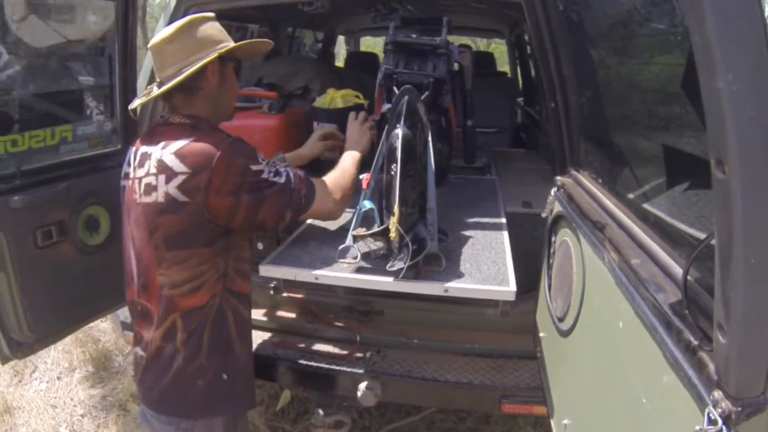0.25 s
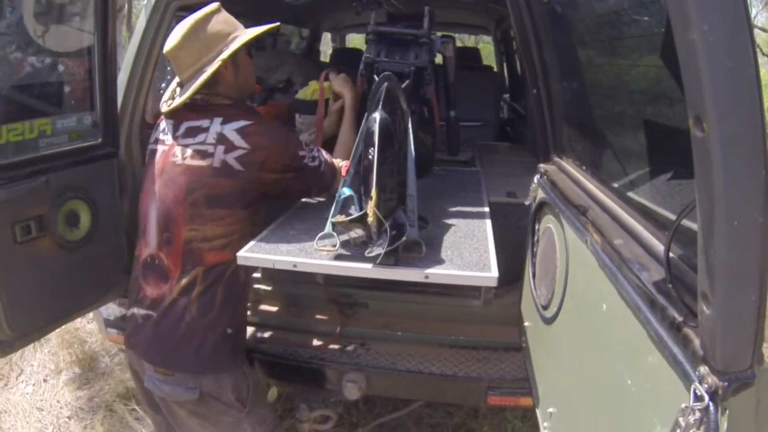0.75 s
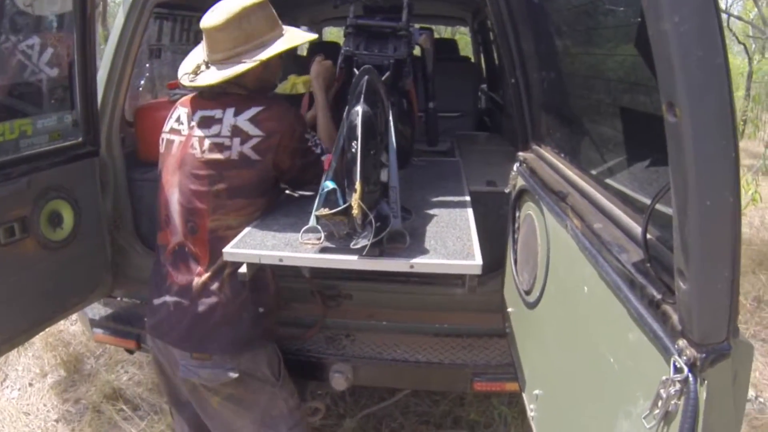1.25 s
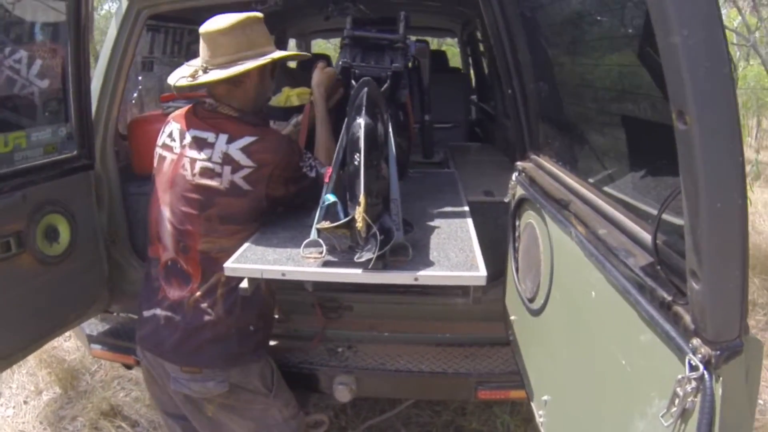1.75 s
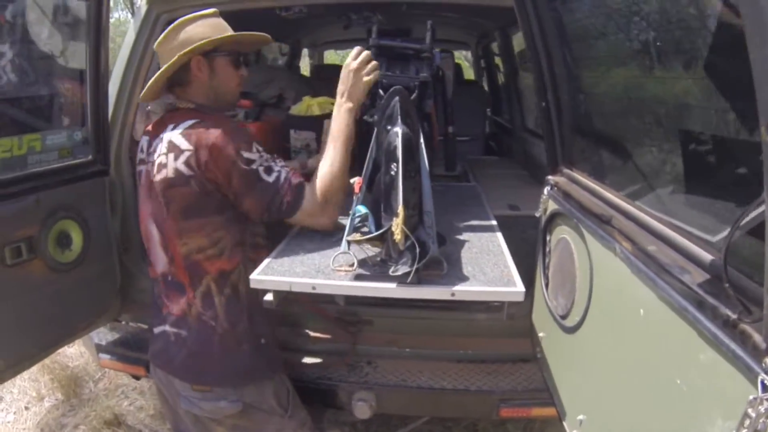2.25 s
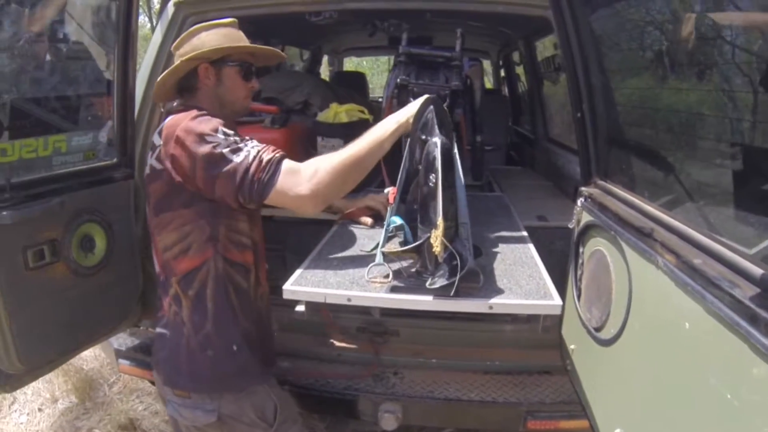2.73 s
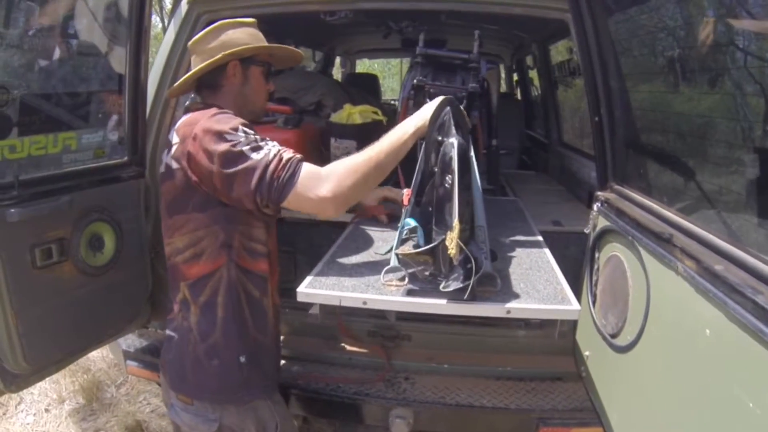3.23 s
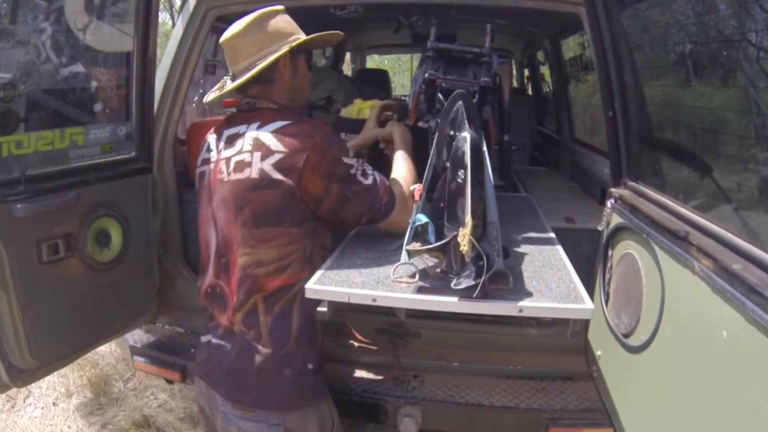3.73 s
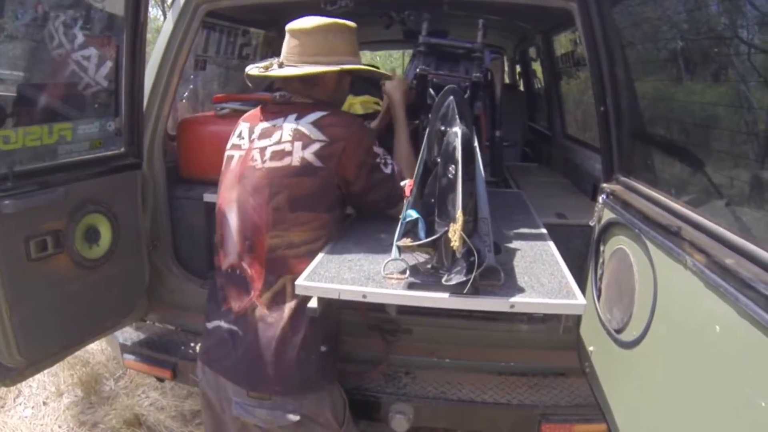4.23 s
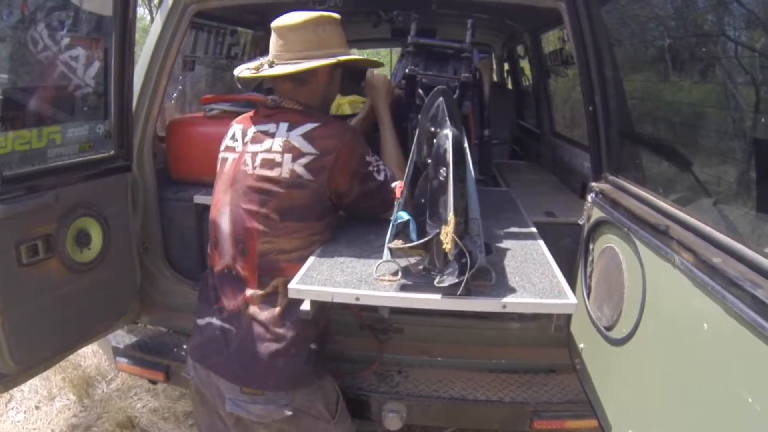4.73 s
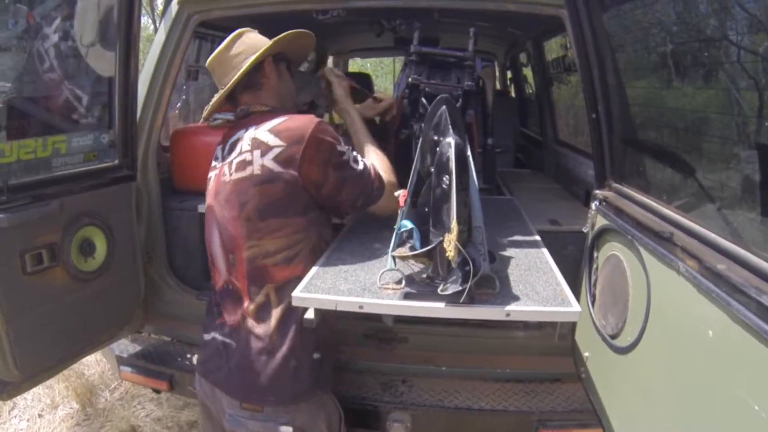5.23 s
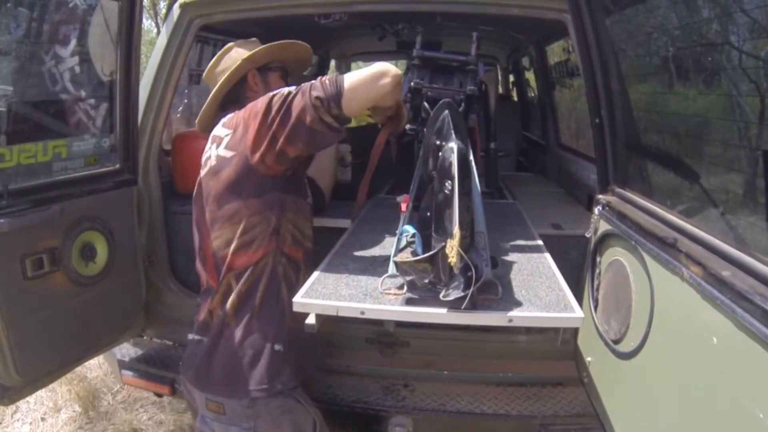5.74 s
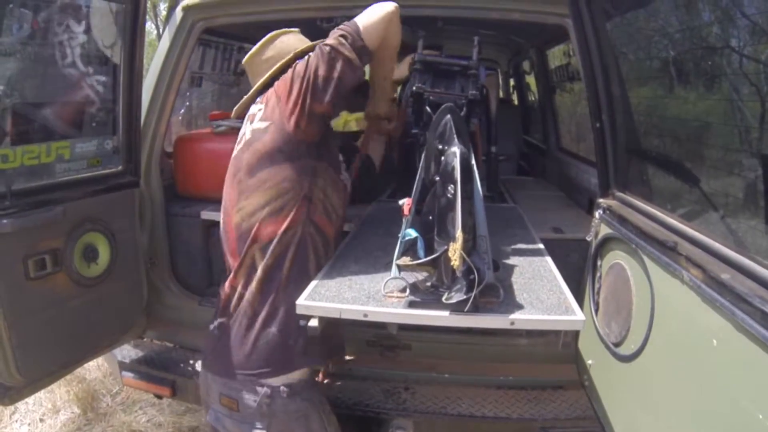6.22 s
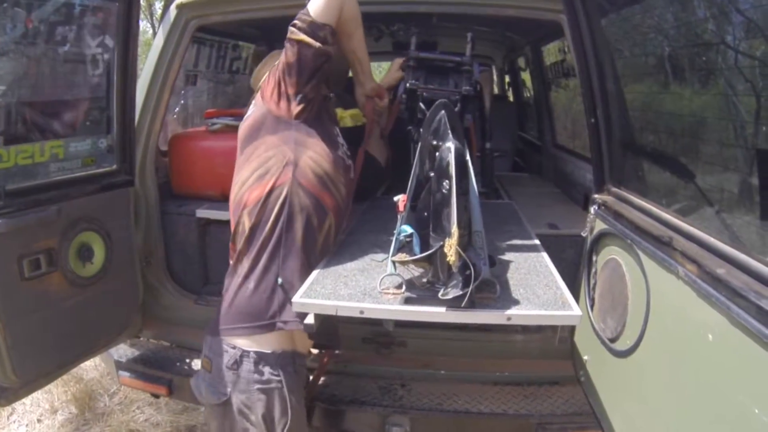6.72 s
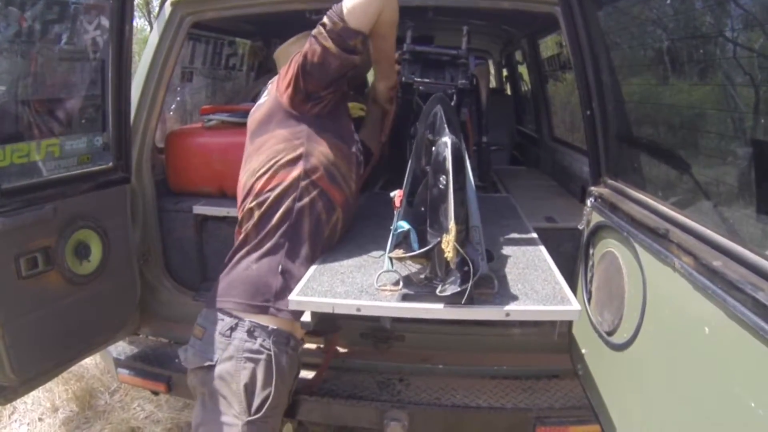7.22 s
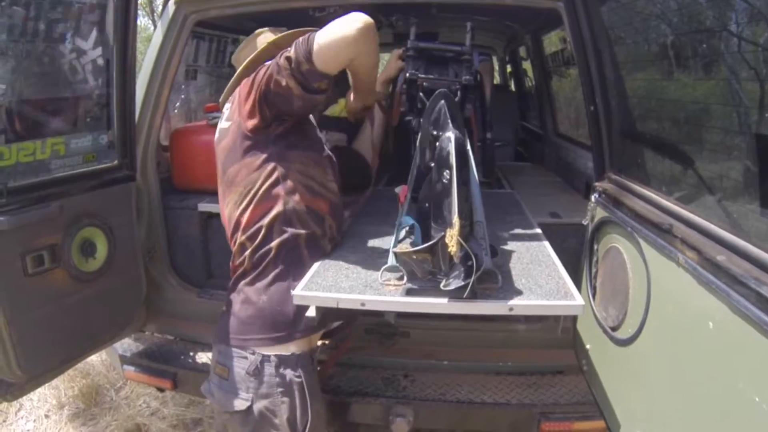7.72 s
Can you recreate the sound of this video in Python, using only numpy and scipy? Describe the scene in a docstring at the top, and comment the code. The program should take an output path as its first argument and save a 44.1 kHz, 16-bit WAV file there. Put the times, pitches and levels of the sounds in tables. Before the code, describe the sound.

A ratchet tie-down strap is worked in the open back of a vehicle in dry bush. Small ticks, then a quick run of sharp steel clicks near one second, a bang on the deck, more clicks at two seconds, hollow knocks and soft bumps. The loudest rattling bang comes just before five seconds, another after seven. Leaves and cloth rustle, insects drone faintly, far birds chirp. Close microphone, short cabin tail.

```python
"""A ratchet strap is worked in the open back of a parked truck in the bush; every blow rings on in the cabin.
Throughout, filtered noise makes rustling leaves and cloth, an insect drone and a buzzing singer.
Struck resonances give first ticks and handle knocks, soft bumps from 0.8 s, pawl clicks from 1 s and scuffs
from 1.7 s. The load bangs on the drawer deck at 1.4 s, hardest at 4.7 s, and again at 7.1 s.
A few far birds, gliding sine tones, chirp at 0.1 s and between 4.3 and 5.9 s."""
import sys
import numpy as np
from scipy import signal
from scipy.io import wavfile
from scipy.ndimage import uniform_filter1d

SR = 44100
rng = np.random.default_rng(int(sys.argv[2]) if len(sys.argv) > 2 else 0)


def dump_mix(stems):
    """Bounce the given channels to the path in sys.argv[1] as a 16-bit WAV at rate SR."""
    frames = np.atleast_2d(stems).T  # one column per channel
    limited = np.clip(frames, -1, 1)  # hard clip at full scale
    pcm = np.round(limited * 32767).astype(np.int16)
    wavfile.write(sys.argv[1], SR, pcm)


N = 351471


def from_db(db):
    """Gain of a level in dB."""
    return 10 ** (np.asarray(db) / 20)


def rms_one(x):
    """Scales a signal to rms 1."""
    return x / np.sqrt(np.mean(x ** 2) + 1e-20)


def resonate(x, hz, width_hz):
    """Two-pole resonance with a gain of about 1 at its peak."""
    radius = np.exp(-np.pi * width_hz / SR)
    feedforward = (1 - radius ** 2) / 2 * np.array([1, 0, -1])
    feedback = [1, -2 * radius * np.cos(2 * np.pi * hz / SR), radius ** 2]
    return signal.lfilter(feedforward, feedback, x)


def highpass(x, order, hz):
    """Takes out the bass below an edge."""
    return signal.sosfilt(signal.butter(order, hz, "high", fs=SR, output="sos"), x)


def softened(x, hz):
    """A softer contact carries no treble: a steep low-pass."""
    return signal.sosfilt(signal.butter(6, min(hz, .45 * SR), fs=SR, output="sos"), x)


def drift(rate_hz):
    """Random wander of rms 1: noise smoothed by two equal poles at the given rate."""
    step = 40  # samples between computed points
    r = np.exp(-2 * np.pi * step * rate_hz / SR)
    noise = rng.standard_normal(N // step + 2002)
    wander = signal.lfilter([1], [1, -2 * r, r * r], noise)[2000:]  # skip the filter's start
    return np.interp(np.arange(N) / step, np.arange(len(wander)), rms_one(wander))


def burst(rise_s, t60, tail_db, tail_t60, strike_db, rebounds=(), grain_share=1):
    """A clean strike and its rebounds, a crowd of close echoes and rattles, then a weaker, duller cabin tail."""
    t = np.arange(SR // 2) / SR
    rise = (1 - np.exp(-t / max(rise_s, 1e-5))) ** 2
    rattle, tail = rng.standard_normal((2, len(t)))
    # a small grain share leaves sparse, stronger grains
    share = np.clip(grain_share, .002, 1)
    rattle = rattle * (rng.random(len(t)) < share) / np.sqrt(share)
    dull = np.exp(-2 * np.pi * 5000 / SR)  # one pole at 5 kHz
    tail = signal.lfilter([1 - dull], [1, -dull], tail)
    rattle_gain = from_db(-60 * t / t60)
    tail_gain = from_db(tail_db - 60 * t / tail_t60)
    out = rise * (rattle_gain * rattle + tail_gain * tail)
    for later_s, db in [(0, 0), *rebounds]:
        out[round((2 * rise_s + later_s) * SR)] += from_db(strike_db + db)
    return out


def ring(x, modes):
    """Parallel resonances (pitch [Hz], width [Hz], level [dB]) with alternating signs."""
    out = 0
    for k, (hz, width, db) in enumerate(modes):
        out = out + (-1) ** k * from_db(db) * resonate(x, hz, width)
    return out


def tilted(modes, low_hz, low_db, high_hz, high_db):
    """The modes, with those under and over two edges struck harder or softer."""
    return [(hz, width, db + low_db * (hz < low_hz) + high_db * (hz > high_hz)) for hz, width, db in modes]


def add(out, s, peak_db, sound):
    """Places a sound, levelled by the loudest 3 ms within its first 20 ms."""
    at = round(s * SR)
    head_rms = np.sqrt(uniform_filter1d(sound[:SR // 50] ** 2, size=130).max())
    levelled = from_db(peak_db - 4.5) / head_rms * sound  # rms 4.5 dB under the nominal peak
    out[at:at + len(sound)] += levelled[:N - at]


def single_notes(rows, sharpness, rise_s, skirt, reach, strike_db):
    """Blows through one broad mode each, two resonances deep, cut steeply above reach times the pitch."""
    out = np.zeros(N)
    for s, peak_db, hz, t60 in rows:
        blow = burst(rise_s, t60, -21, 0.13, strike_db)
        width = hz / sharpness
        note = resonate(resonate(blow, hz, width), hz, skirt * width)
        add(out, max(s - rise_s, 0), peak_db, softened(note, reach * hz))
    return out


# swells of leaves, cloth and strap: (time [s], level [dB]); only the height above the lowest row counts
RUSTLE_SWELLS = [(0.0, -73), (0.95, -72.5), (1.28, -65.5), (1.8, -69.5), (2.201, -66.5), (2.68, -70.5),
                 (3.0, -63.5), (3.31, -72.5), (3.79, -73), (4.68, -77.5), (4.82, -55), (4.9, -62.5),
                 (5.06, -64.5), (5.44, -68.5), (5.88, -72), (6.88, -70.5), (7.19, -62.5), (7.57, -72.5)]
# tone colour of the bed: (frequency [Hz], relative level [dB])
AIR_COLOUR = [(30, -32), (150, -6), (240, -5.5), (900, -1.5), (1430, -12), (1930, -5.5), (2490, -18),
              (3440, -15.5), (4640, -27), (6500, -31.5), (9000, -36), (11800, -42.5), (13600, -35),
              (15300, -47.5)]
RUSTLE_TREBLE_SHARE = 0.41  # share of the swing that reaches the treble


def air():
    """Leaves, cloth and strap: third-octave noise bands, each wavering; the rustle lifts the bass most."""
    s, level_db = np.transpose(RUSTLE_SWELLS)
    swing_db = np.interp(np.arange(N) / SR, s, level_db - level_db.min())
    colour_hz, colour_levels_db = np.array(AIR_COLOUR).T
    edges = 30 * 2 ** (np.arange(28) / 3)
    white = rng.standard_normal((2, N))
    out = 0
    for k, (low, high) in enumerate(zip(edges, edges[1:])):
        hz = np.sqrt(low * high)
        band_filter = signal.butter(2, [low, high], "band", fs=SR, output="sos")
        band = signal.sosfilt(band_filter, white[k % 2])  # neighbours use different noise
        treble = np.clip(np.log2(hz / 900), 0, 1)
        reach = np.clip(np.log2(9000 / hz), 0, 1)  # the rustle does not reach the far treble
        rustle_db = reach * (1 - treble + treble * RUSTLE_TREBLE_SHARE) * swing_db
        colour_db = np.interp(np.log(hz), np.log(colour_hz), colour_levels_db)
        waver_db = 1.3 * drift(9)
        out = out + band * from_db(colour_db - 55.0 + rustle_db + waver_db)
    return out


# drone and its octave: (pitch [Hz], width [Hz], rms level before waver [dB], waver rate [Hz], waver [dB])
DRONE = [(5113, 150, -92.5, 20, -0.5), (10250, 350, -103, 25, 1.2)]
# buzzing singer: (pitch [Hz], width [Hz], rms level [dB])
BUZZ_BANDS = [(7850, 400, -105), (15000, 500, -107)]
PHRASES_PER_S, PHRASE_AT_S, PHRASE_DB = 4.65, 3.38, 7  # one phrase peaks at PHRASE_AT_S
BUZZ_PER_S, BUZZ_DB = 60, 6


def insects():
    """Narrow noise bands: a thin steady drone with its octave, and a singer buzzing in short even phrases."""
    t = np.arange(N) / SR
    phrases_db = PHRASE_DB * np.cos(2 * np.pi * PHRASES_PER_S * (t - PHRASE_AT_S))
    buzz_db = BUZZ_DB * np.cos(2 * np.pi * BUZZ_PER_S * t)
    singer_db = phrases_db + buzz_db + 2.5 * drift(1.1)
    out = 0
    for hz, width, db, rate_hz, waver_db in DRONE:
        song = resonate(resonate(rng.standard_normal(N), hz, width), hz, width)
        out = out + from_db(db + waver_db * drift(rate_hz)) * rms_one(song)
    for hz, width, db in BUZZ_BANDS:
        song = resonate(resonate(rng.standard_normal(N), hz, width), hz, width)
        out = out + from_db(db) * rms_one(from_db(singer_db) * song)
    return out


# small ticks of buckle and hooks; the 1.566 s row is the treble scrape of the load bang at 1.564 s, the 2.9645
# s row # the upper ring of the knock at 2.965 s: (time [s], nominal peak [dB], pitch [Hz], rattle t60 [s])
BUCKLE_TICKS = [(0.0044, -43, 1806, 0.013), (0.639, -51, 2640, 0.073), (1.309, -53, 1920, 0.029),
                (1.4137, -49, 1885, 0.017), (1.4154, -59, 3600, 0.025), (1.566, -64, 8650, 0.1),
                (1.6, -61.5, 5960, 0.086), (1.6035, -42, 2850, 0.01), (1.614, -43.5, 2630, 0.016),
                (2.456, -60.5, 3100, 0.022), (2.4578, -51.5, 1730, 0.041), (2.7467, -50.5, 4350, 0.027),
                (2.7477, -35.5, 1920, 0.013), (2.7781, -64, 4350, 0.077), (2.7826, -48.5, 1960, 0.19),
                (2.852, -42.5, 3280, 0.078), (2.9645, -44, 2380, 0.034), (3.103, -50.5, 2050, .02),
                (3.2216, -53, 2190, 0.024), (4.0347, -54, 3750, 0.012), (4.0472, -61.5, 6300, 0.022),
                (4.9057, -59, 4600, 0.11), (5.7024, -56.5, 4400, 0.041), (5.7034, -57, 3400, 0.033),
                (6.315, -66, 5900, 0.033), (6.3185, -42, 1920, 0.03), (7.2494, -65, 6130, .1),
                (7.6106, -51, 4500, 0.073), (7.6116, -42.5, 3470, 0.03), (7.6555, -67.5, 5200, .03)]


def ticks():
    """Buckle and hooks, the treble scrape of one bang and the upper ring of one knock: small light blows, each
    ringing one fairly narrow mode."""
    return single_notes(BUCKLE_TICKS, sharpness=8.9, rise_s=0.0018, skirt=1.46, reach=1.38, strike_db=10.5)


# handle and hook knocks: (time [s], nominal peak [dB], main pitch [Hz], upper mode [dB re main])
HANDLE_KNOCKS = [(0.054, -49, 910, -40), (1.243, -47.5, 730, -17), (2.547, -50.5, 664, -27),
                 (2.59, -38.5, 938, -44), (2.661, -70, 767, -25), (2.965, -35, 1022, -5),
                 (3.078, -52, 920, -16), (3.22, -45.5, 870, -17), (3.296, -56.5, 633, -19),
                 (3.478, -57.5, 980, -25), (4.055, -35.5, 1020, -32), (4.52, -46, 984, 7),
                 (4.604, -31, 1046, -11), (5.043, -21, 890, -50), (5.27, -45.5, 860, -3),
                 (5.417, -37, 904, -39), (5.571, -42, 876, -40), (5.667, -55, 840, -35),
                 (5.703, -48.5, 960, -18), (6.15, -33, 830, -52), (6.318, -51, 660, 3.5),
                 (6.574, -28.5, 916, -2.5), (7.03, -34, 842, -39)]
KNOCK_T60_S, KNOCK_WIDTH_HZ = 0.051, 206
KNOCK_UPPER_HZ, KNOCK_LOW_HZ = (1970, 400), (227, 230)  # (pitch [Hz], width [Hz])


def knocks():
    """Short hollow blows: a main mode, one at 1970 Hz and one at 227 Hz, each three resonances in series."""
    out = np.zeros(N)
    for s, peak_db, main_hz, upper_db in HANDLE_KNOCKS:
        blow = burst(0.00054, KNOCK_T60_S, -20.5, 0.14, strike_db=22.0)
        low_db = -24 + 0.07 * peak_db  # a harder knock has slightly more of the low mode
        modes = [(main_hz, KNOCK_WIDTH_HZ, 0), (*KNOCK_UPPER_HZ, upper_db), (*KNOCK_LOW_HZ, low_db)]
        sound = 0
        for hz, width, db in modes:
            swelling = resonate(resonate(blow, hz, width), hz, width)
            sound = sound + from_db(db) * resonate(swelling, hz, 1.6 * width)
        add(out, s - .003, peak_db, softened(sound, 1600))
    return out


# bird chirps: (time [s], length [s], first pitch [Hz], last pitch [Hz], level before fades and trees [dB rms])
CHIRPS = [(0.115, 0.016, 4200, 4730, -75), (4.271, 0.034, 4300, 4930, -63), (4.415, 0.025, 6400, 6130, -88),
          (5.431, 0.11, 6520, 3330, -73.5), (5.889, 0.024, 4010, 3900, -74.5)]
GLIDE_CURVE = 3.0  # above 1 the glide slows down towards its end


def birds():
    """Far whistles: gliding sines, faded in and out, roughened and smeared by the trees."""
    out = np.zeros(N)
    for s, length_s, first_hz, last_hz, level_db in CHIRPS:
        t = np.linspace(0, 1, round(length_s * SR))
        hz = last_hz + (first_hz - last_hz) * (1 - t) ** GLIDE_CURVE
        tone = np.sqrt(2) * np.sin(2 * np.pi * np.cumsum(hz) / SR) * from_db(level_db)
        at = round(s * SR)
        out[at:at + len(t)] += tone * signal.windows.tukey(len(t), .4)
    rough = out * from_db(4.0 * drift(72))
    echoes = rms_one(burst(0.00078, 0.075, -54, 0.17, strike_db=-27.0)) / np.sqrt(SR / 2)  # unit energy
    return signal.fftconvolve(rough, echoes)[:N]


# soft bumps of body and load: (time [s], nominal peak [dB], pitch [Hz])
BODY_THUMPS = [(0.816, -51.5, 215), (0.828, -54.5, 106), (1.276, -44, 260), (1.345, -41.5, 374),
               (1.369, -42.5, 297), (1.599, -55, 256), (1.625, -47.5, 273), (1.667, -45, 243),
               (2.784, -43, 344), (2.807, -47.5, 205), (2.881, -50, 269), (3.012, -59, 308),
               (3.105, -49, 426), (3.258, -55, 272), (3.359, -52, 278), (4.047, -44.5, 238),
               (4.275, -54.5, 505), (4.711, -29, 330), (4.728, -28.5, 231), (4.76, -38, 264),
               (6.317, -51, 296), (7.125, -25.5, 236), (7.228, -23.5, 223), (7.246, -30.5, 260)]
THUMP_T60_S = 0.12


def thumps():
    """Body and load: soft low bumps, each a slow-rising blow through one broad mode."""
    rows = [(*row, THUMP_T60_S) for row in BODY_THUMPS]
    return single_notes(rows, sharpness=3.45, rise_s=0.00403, skirt=19.0, reach=6.1, strike_db=15)


# pawl over a tooth: (time [s], nominal peak [dB], modes over 5 kHz [dB shift], rise [s])
PAWL_CLICKS = [(0.9893, -32, -9, .0009), (1.0255, -33, -9, 0.00068), (1.0532, -31.5, -12.5, 0.00056),
               (1.074, -32.5, -9, 0.0013), (1.109, -33, -6, 0.0013), (1.1916, -30, -3, .0013),
               (1.949, -31.5, -2.5, 0.0011), (1.9602, -33.5, -6, 0.00079), (2.0125, -28.5, -1.2, 0.0015),
               (2.0774, -29.5, -2.5, 0.00098), (2.851, -37.5, 1, 0.006), (4.6008, -30, -7, 0.0043),
               (4.9748, -29, -1.7, 0.0009), (5.077, -31, -1.5, 0.001), (7.231, -24, -7, 0.0012),
               (7.842, -34.5, -5.5, 0.0035)]
# modes of the ratchet and frame: (pitch [Hz], width [Hz], level [dB])
RATCHET_MODES = [(526, 90, -10.5), (1063, 260, -9.5), (1582, 203, -3), (1895, 123, 1.96), (2058, 140, -4.5),
                 (2250, 130, -4.5), (2720, 120, -8.5), (3007, 130, -13), (3420, 120, -9.5), (3695, 170, -9),
                 (4264, 150, -10.5), (4853, 130, -19), (5280, 300, -20), (6360, 470, -24),
                 (7340, 220, -25.5), (7900, 200, -27.5), (8450, 220, -24), (10450, 720, -31.5),
                 (11700, 440, -37), (13200, 700, -50.5)]
# the pawl bounces: (delay [s], level [dB re first strike])
PAWL_BOUNCES = [(.0034, 2.5), (.0068, -9.5)]
PAWL_T60_S, PAWL_T60_PER_RISE = 0.054, 9  # a slower snap also rings longer
PAWL_STRIKE_DB, FRAME_LAG_S = 21, .004


def pawl():
    """A sprung steel pawl snaps home and bounces; the frame's two lowest modes answer a moment later."""
    out = np.zeros(N)
    for s, peak_db, treble_db, rise_s in PAWL_CLICKS:
        modes = tilted(RATCHET_MODES, 0, 0, 5000, treble_db)
        t60 = PAWL_T60_S + PAWL_T60_PER_RISE * rise_s
        snap = burst(rise_s / 2, t60, -15, 0.24, PAWL_STRIKE_DB, PAWL_BOUNCES, grain_share=.25)
        late = np.pad(snap, (round(FRAME_LAG_S * SR), 0))[:len(snap)]
        click = ring(late, modes[:2]) + ring(snap, modes[2:])
        add(out, s - rise_s, peak_db, softened(click, 14500))
    return out


# load against the deck: (time [s], nominal peak before the bass cuts [dB], modes over 1300 Hz [dB shift],
# modes under 700 Hz [dB shift], rattle t60 [s], contact time [ms], damping [x mode width])
LOAD_BANGS = [(1.415, -38.5, -13, 1.5, 0.08, 0.19, 2.6), (1.562, -33, 0, -10, 0.041, 0.19, 1.7),
              (1.564, -22.5, 10, -8.5, 0.056, 0.35, 16.3), (4.698, -13.5, 11.5, 8, 0.15, 0.22, 1.64),
              (4.7055, -9.5, -2.5, 4.5, 0.068, 0.34, 0.99), (4.712, -13, 4, -6, 0.073, 0.18, 1.7),
              (4.724, -16, 2.5, -2.5, 0.091, 0.24, 1), (4.731, -19, -4.5, -11, 0.065, 0.52, 1.3),
              (4.744, -20, -16, 7, 0.046, 0.73, 1.6), (4.759, -23.5, 3.5, 6.5, .22, 0.47, 1.6),
              (4.897, -25, 0, -16, 0.13, 0.39, 1.5), (4.907, -19, -7, -11, 0.09, 0.59, 5.5),
              (4.92, -31.5, -12, -3, 0.042, 0.35, 7), (4.9292, -31.5, -16, -7, 0.13, 0.37, 5.3),
              (4.944, -29, -7.5, -12, 0.065, 0.55, 7.5), (7.1185, -25, -2.5, -5.5, 0.032, 0.35, 2.6),
              (7.1215, -17, 4, -12, 0.038, 0.43, 2.2), (7.126, -15.5, -5, 7.5, 0.042, 0.47, 3.6),
              (7.135, -27, -24, -15, .08, 0.4, 0.34), (7.187, -23, -13, -1.5, 0.038, 0.45, 1.6),
              (7.194, -24, -15, -8, 0.065, 0.73, 0.8), (7.223, -20.5, -9, -8, 0.084, 0.34, 1.2),
              (7.229, -18, 3, -3, 0.056, 0.2, 0.94), (7.238, -21, -10, -2.5, 0.029, 0.34, 2.3)]
# modes of the drawer deck: (pitch [Hz], width before damping [Hz], level before shifts [dB])
DECK_MODES = [(514, 58, 3), (628, 70, 6.5), (767.5, 49, 3), (909, 18, 7), (1101, 67, -0.5),
              (1220, 120, -11.5), (1300, 78, -7), (1510, 230, -16.5), (1707, 98, -10.5), (1943, 82, -5.5),
              (2254, 120, -11), (2967, 160, -19), (3682, 80, -17), (4070, 410, -25), (5260, 3900, -29.5)]
DECK_EDGE_HZ = 406  # the deck radiates little below this


def bangs():
    """Heavy blows keep rattling the deck's modes; a longer contact is duller, a held load rings less."""
    out = np.zeros(N)
    for s, peak_db, upper_db, low_db, t60, contact_ms, damping in LOAD_BANGS:
        struck = tilted(DECK_MODES, 700, low_db, 1300, upper_db)
        modes = [(hz, damping * width, db) for hz, width, db in struck]
        blow = burst(0.001433, t60, -20.0, 0.23, strike_db=20, grain_share=.12)
        add(out, s - .003, peak_db, softened(ring(blow, modes), 1e3 / contact_ms))
    return highpass(out, 3, DECK_EDGE_HZ)


# scuffs of strap and hand: (time [s], nominal peak [dB], centre [Hz], rattle t60 [s])
STRAP_SCUFFS = [(1.669, -48, 700, 0.08), (2.287, -49, 940, 0.071), (3.144, -47, 680, 0.043),
                (3.541, -54.5, 1350, 0.074)]


def scuffs():
    """Strap and hand: broad noisy strokes, each through one very wide resonance."""
    return single_notes(STRAP_SCUFFS, sharpness=1.9, rise_s=0.002, skirt=1.95, reach=4, strike_db=8)


def scene():
    """All sources on one channel; small bodies radiate no deep bass."""
    blows = highpass(ticks() + knocks() + pawl() + bangs() + scuffs(), 4, 150)
    bumps = highpass(thumps(), 2, 104)
    return (air() + insects() + blows + birds() + bumps)[None]


def record(dry):
    """The top is cut steeply, 60 dB down from 15.9 kHz."""
    return signal.sosfilt(signal.cheby2(12, 60, 15900, fs=SR, output="sos"), dry)


dry = scene()
out = record(dry)
dump_mix(out)
```